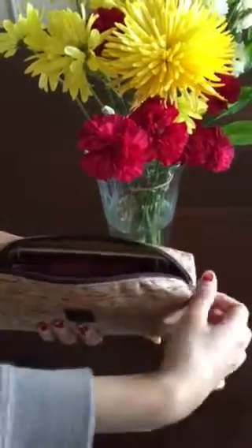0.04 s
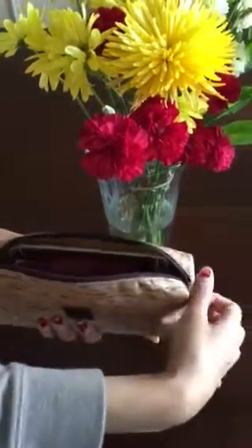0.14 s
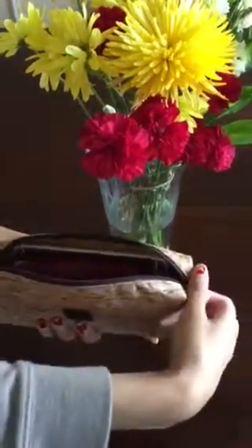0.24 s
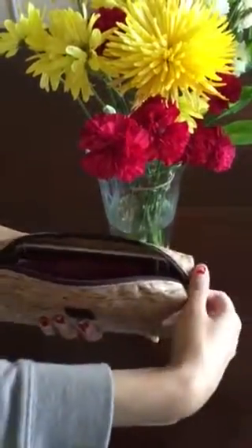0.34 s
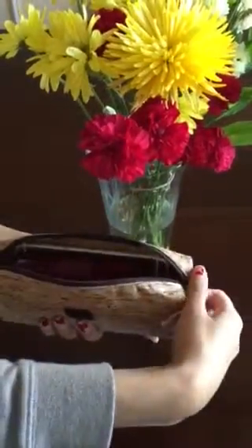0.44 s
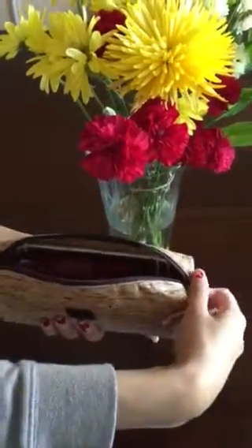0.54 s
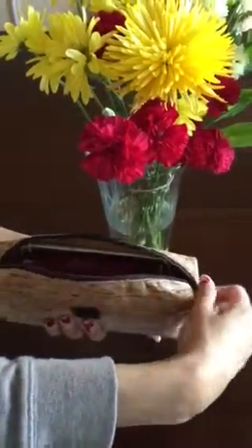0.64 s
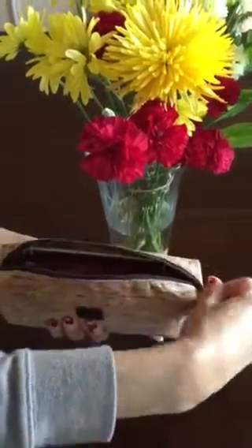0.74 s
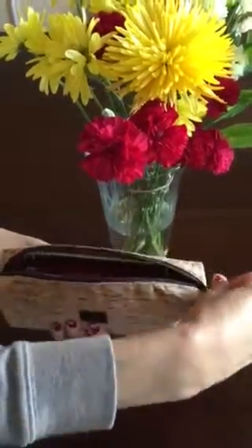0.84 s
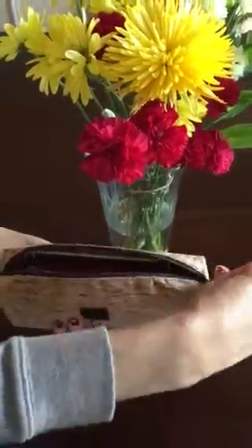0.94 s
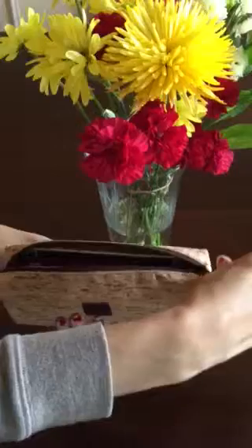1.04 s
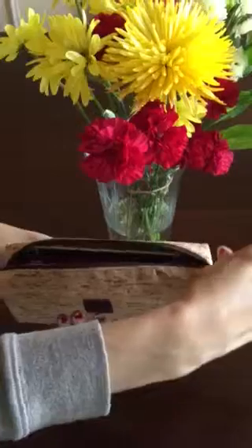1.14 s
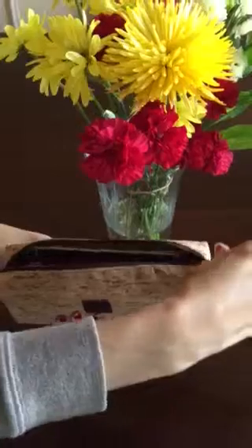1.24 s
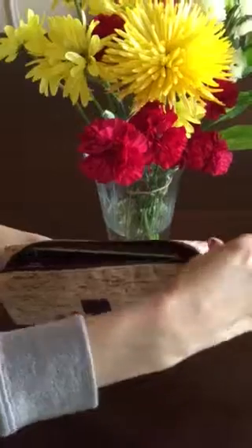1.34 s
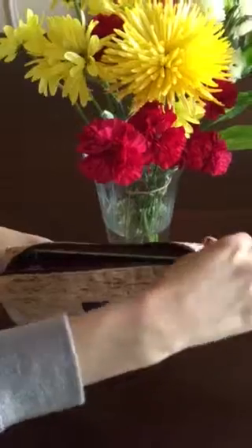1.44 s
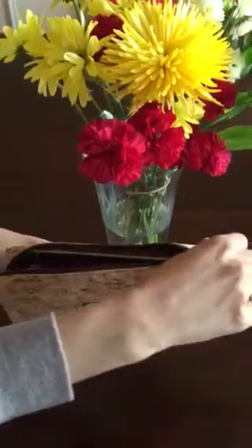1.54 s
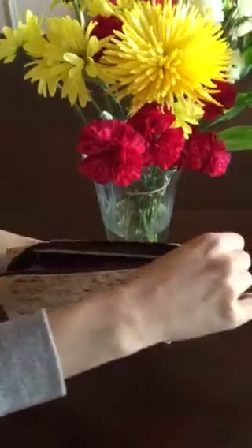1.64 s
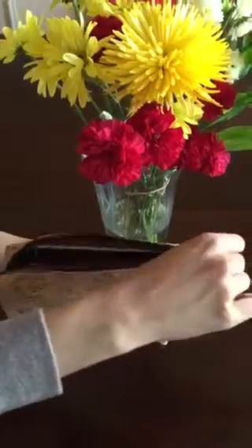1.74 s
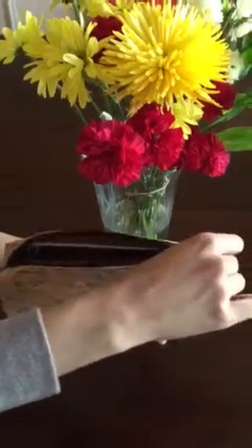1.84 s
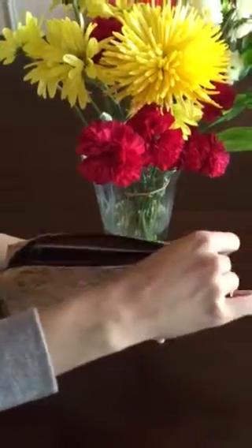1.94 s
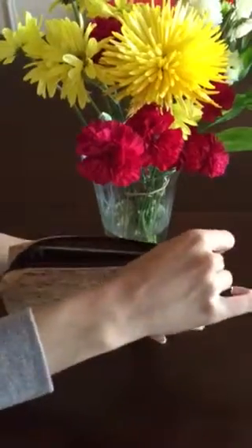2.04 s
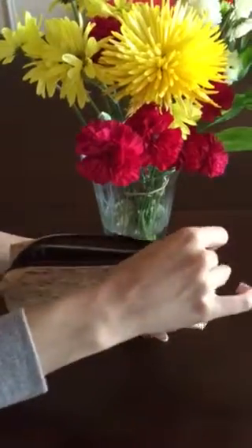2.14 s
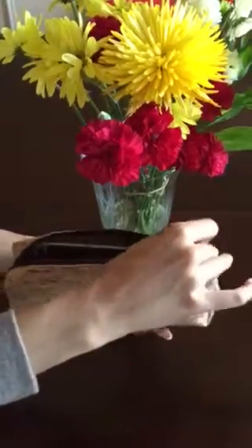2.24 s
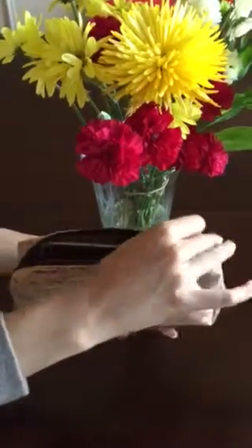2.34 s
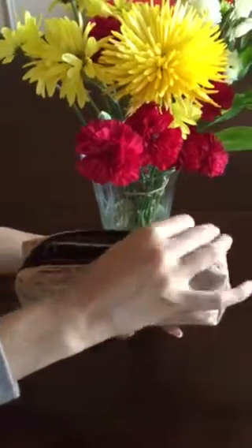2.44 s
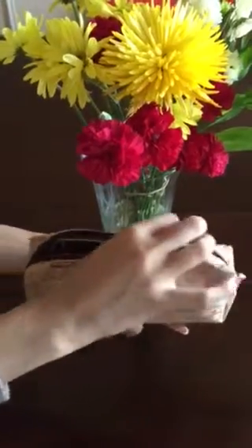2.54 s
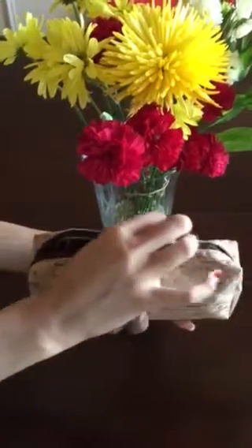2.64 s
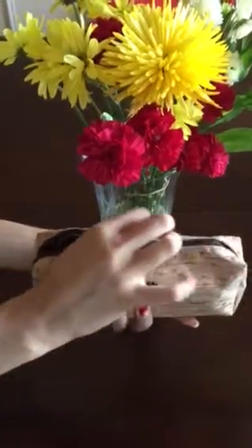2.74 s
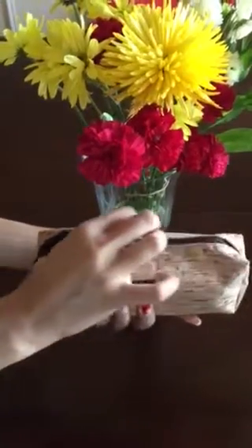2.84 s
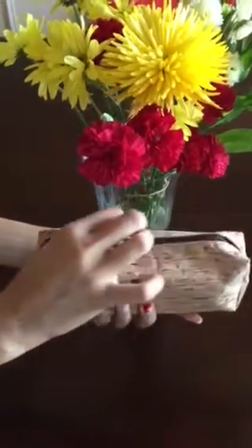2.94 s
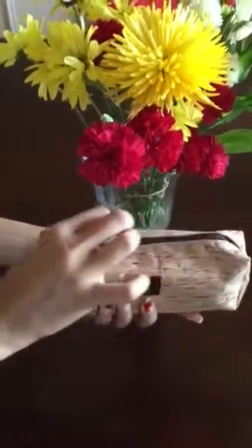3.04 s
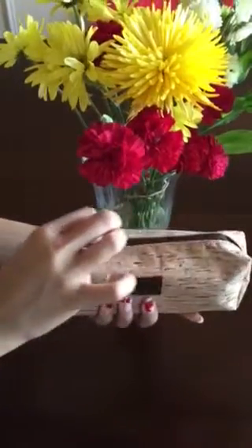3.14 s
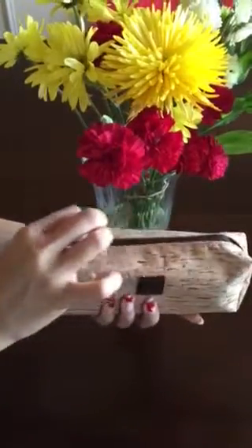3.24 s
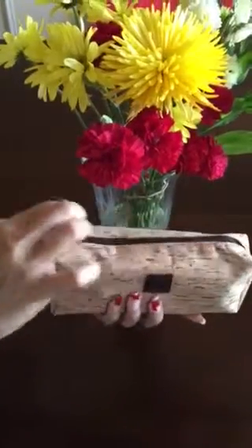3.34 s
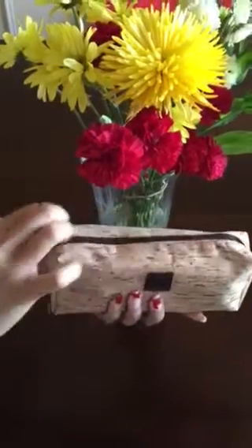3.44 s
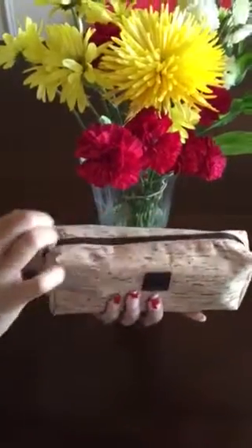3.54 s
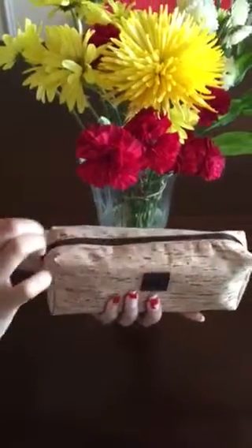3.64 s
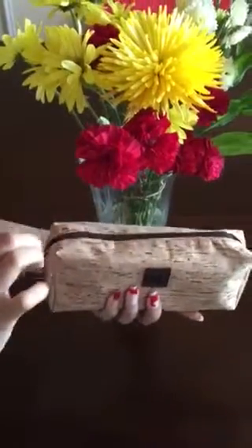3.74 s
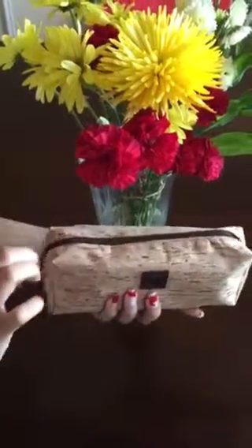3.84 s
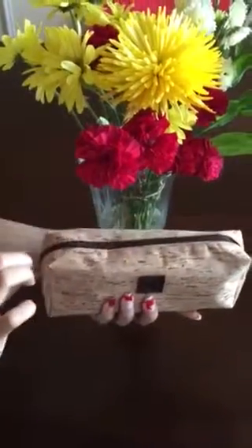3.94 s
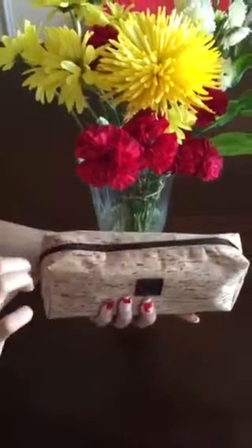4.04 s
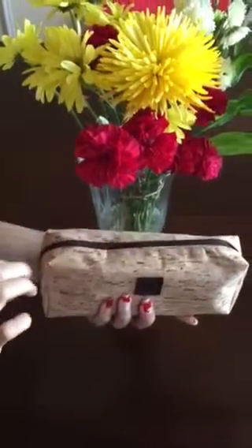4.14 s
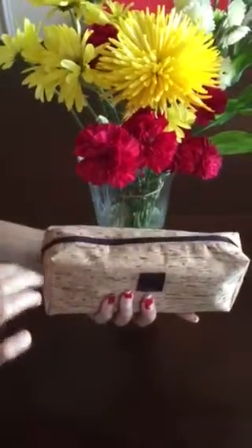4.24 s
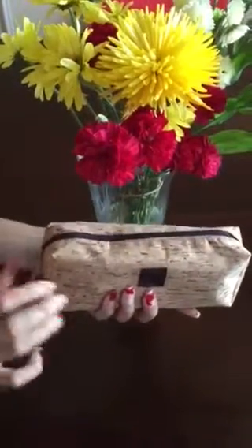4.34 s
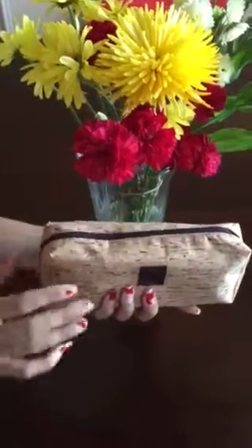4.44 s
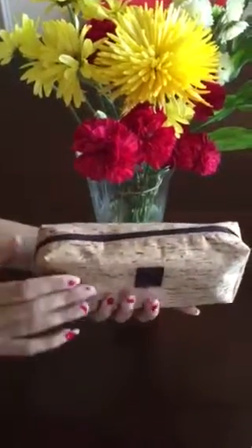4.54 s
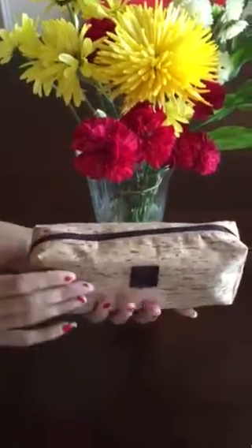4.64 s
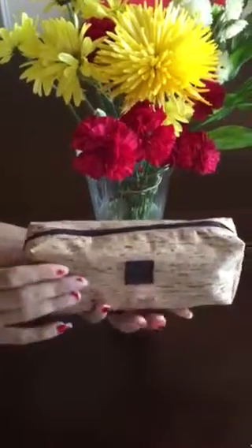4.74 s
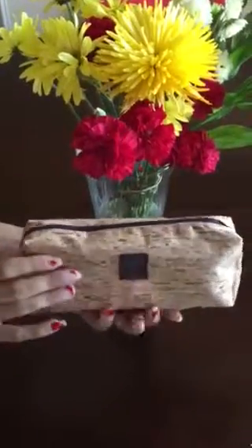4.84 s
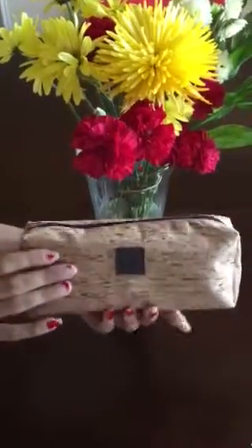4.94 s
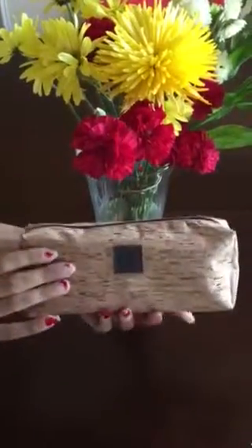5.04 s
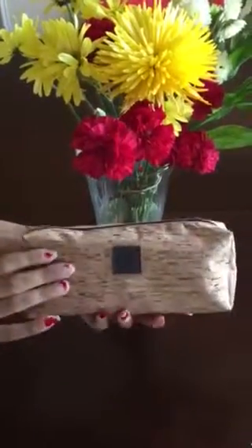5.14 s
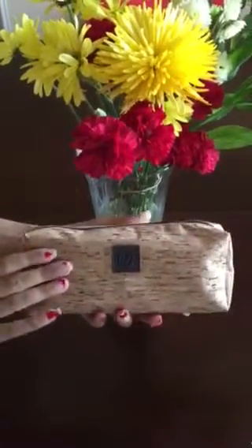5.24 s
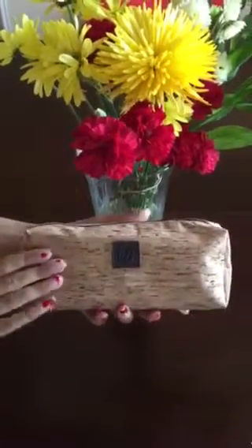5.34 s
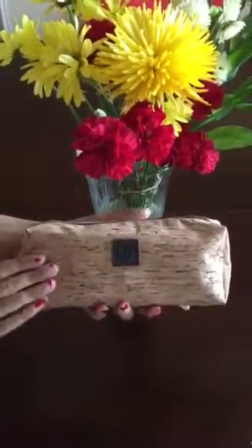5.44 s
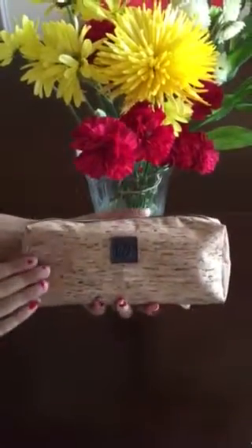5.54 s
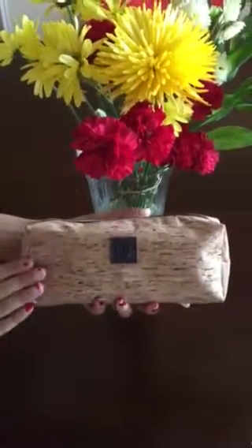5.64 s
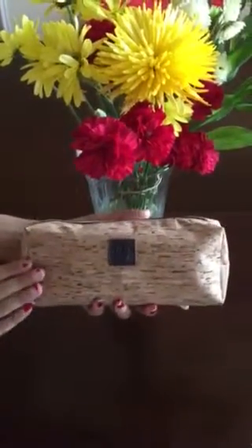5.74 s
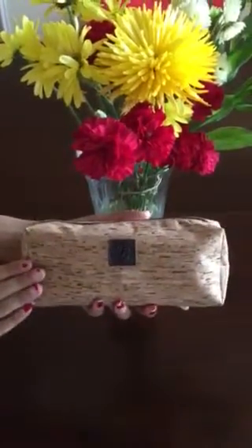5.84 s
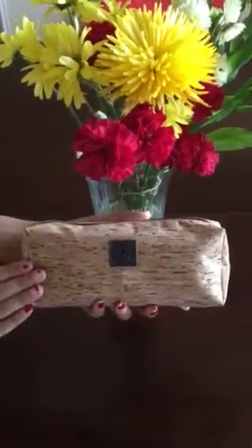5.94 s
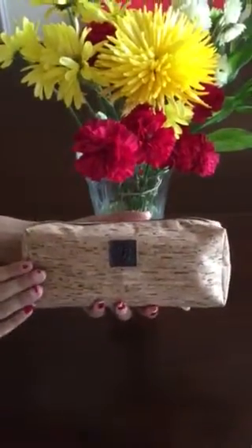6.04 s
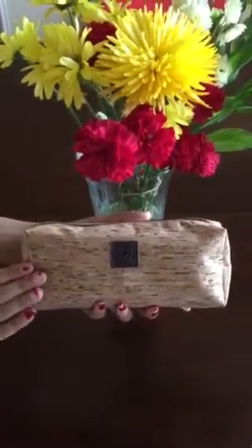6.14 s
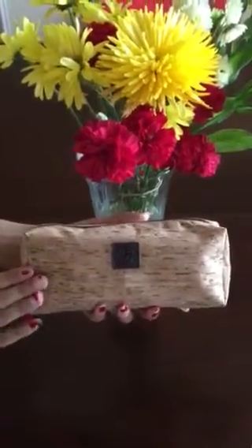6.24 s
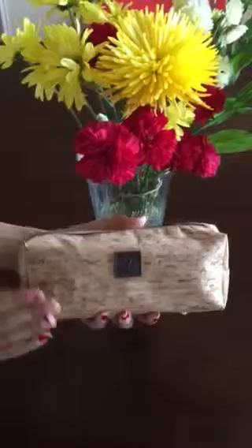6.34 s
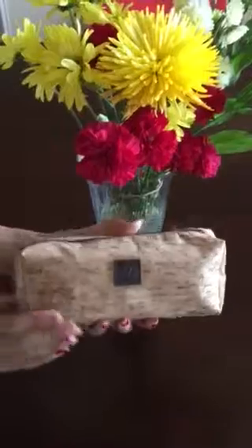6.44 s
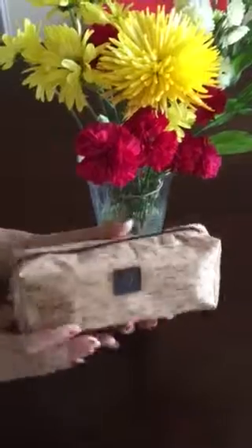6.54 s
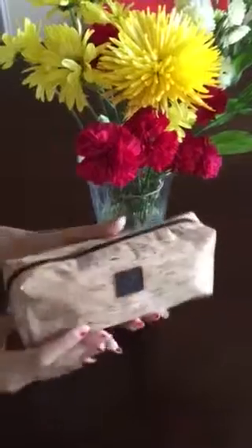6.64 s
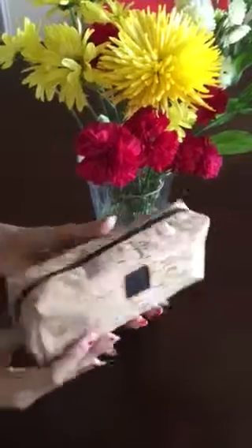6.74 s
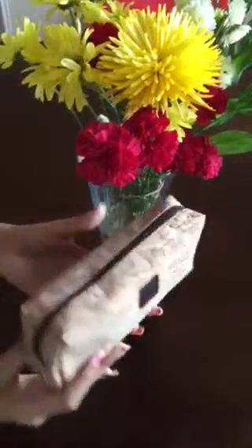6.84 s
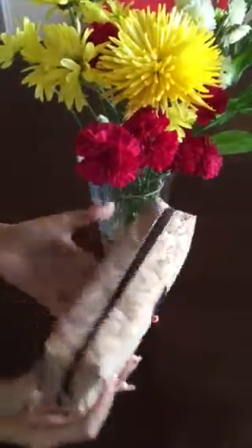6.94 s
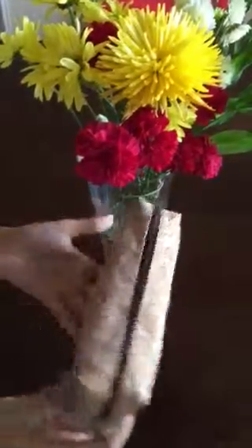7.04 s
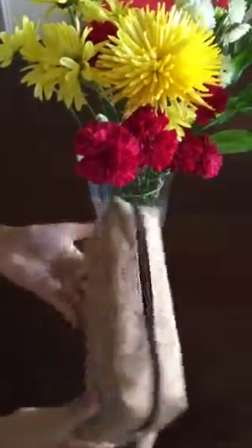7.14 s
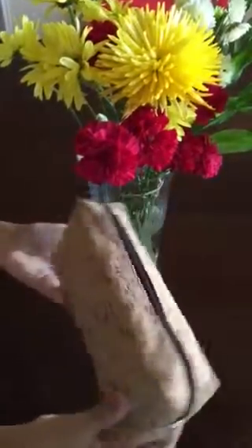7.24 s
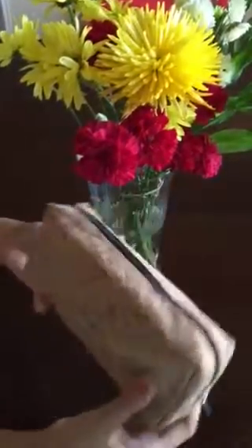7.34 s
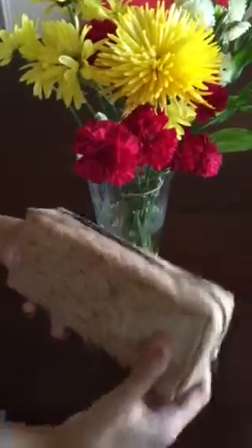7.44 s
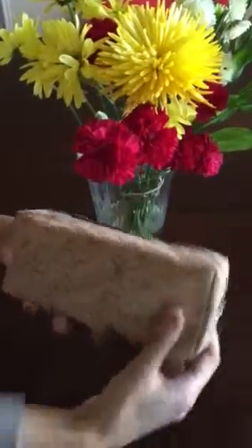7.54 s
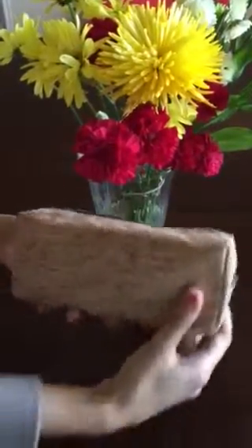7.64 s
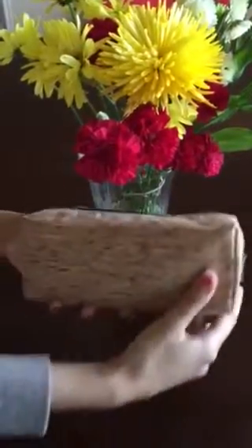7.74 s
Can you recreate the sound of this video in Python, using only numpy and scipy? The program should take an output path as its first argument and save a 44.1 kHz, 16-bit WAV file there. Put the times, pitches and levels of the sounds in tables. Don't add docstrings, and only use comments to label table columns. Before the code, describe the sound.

Fingers fumble at a small stiff pouch, its pull tab clicks, then the zipper is dragged shut in uneven rattling shoves over a faint appliance hum.

```python
import sys
import numpy as np
from scipy import signal
from scipy.fft import rfft, irfft, next_fast_len
from scipy.io import wavfile
from scipy.ndimage import uniform_filter1d, map_coordinates

SR = 44100
rng = np.random.default_rng(int(sys.argv[2]) if len(sys.argv) > 2 else 0)


def digitize_waveform(pressure):
    field = np.atleast_2d(pressure).T
    bounded = np.clip(field, -1, 1)
    quanta = np.round(bounded * 32767).astype(np.int16)
    wavfile.write(sys.argv[1], SR, quanta)


def voltage_ratio(decibels):
    exponent = np.asarray(decibels, float) / 20
    return 10 ** exponent


N = 342789

# (pitch [Hz], level [dB rms], start [cycles])
HUM_LINES = [(120, -54, .49), (117.15, -59, .68), (112.6, -67, .8)]
# (frequency [Hz], level [dB per Hz])
RUMBLE_COLOUR = [(22, -22), (35, -7), (45, -5), (70, 3), (80, -3.5), (92, 3), (104, -3.5), (125, -3.5),
                 (170, -14), (300, -30), (400, -44.5)]
# (frequency [Hz], level [dB per Hz])
AIR_COLOUR = [(90, -52), (150, -12.5), (250, -16), (500, -15.5), (1200, -19), (2800, -21.5), (4800, -27.5),
              (6500, -28.5), (9500, -32), (10500, -49), (11500, -33), (15300, -45)]
# (frequency [Hz], time to fall 60 dB [s])
ROOM_DECAY = [(200, 0.19), (1000, 0.16), (4000, 0.15), (12000, 0.026)]

# (start [s], length [s], fingertip hiss [dB], palm swish relative to it [dB])
RUB_STROKES = [(0.095, 0.047, -76, 2), (0.305, 0.22, -77, -0.5), (0.61, 0.11, -80, -6),
               (0.765, .03, -81, 3), (1.747, 0.054, -70, -1), (1.843, 0.072, -71, -1),
               (1.963, 0.074, -87, 11), (4.853, 0.42, -74.5, 2.5), (5.106, .012, -67, 2),
               (5.123, 0.28, -73.5, -2.5), (5.315, 0.064, -74.5, -5), (5.35, 0.19, -77.5, 2),
               (5.452, 0.3, -69.5, -9.5), (6.356, 0.13, -73, -6), (6.506, 0.27, -65, -8),
               (6.759, 0.17, -71, -0.5), (6.83, 0.7, -78.5, 1), (7.098, 0.019, -90, 9),
               (7.423, 0.27, -75.5, 0.5), (7.604, 0.028, -76, 8), (7.63, 0.2, -82, 4.5)]
# (frequency [Hz], level [dB per Hz])
SKIN_COLOUR = [(5000, -11), (7000, -4.5), (9300, 3), (10500, -1.5), (12500, 0.5), (15300, -5.5)]
# (frequency [Hz], level [dB per Hz])
PALM_COLOUR = [(1000, -9), (2500, -4), (5000, -5.5), (7500, -7), (12000, -50)]
# (frequency [Hz], level [dB per Hz])
CREASE_COLOUR = [(120, -16), (200, 3), (355, 4.5), (512, -11.5), (852, -6.5), (1770, -7.5), (1920, -9),
                 (9000, -44), (11700, -107), (19800, -120)]

# (pitch [Hz], level [dB], time to fall 60 dB [s])
BODY_MODES = [(222.6, 1, 0.019), (330, 3, 0.036), (416, -7, 0.063)]
# (pitch [Hz], level [dB], time to fall 60 dB [s])
PANEL_MODES = [(613, -1, 0.013), (764, 3.5, 0.011), (1020, -12, 0.036)]
# (pitch [Hz], level [dB], time to fall 60 dB [s])
TAPE_MODES = [(1276, 4, 0.0037), (1070, -1, 0.0022), (1828, -3.5, 0.014)]
# (pitch [Hz], level [dB], time to fall 60 dB [s])
SLIDER_MODES = [(2793, 3.5, 0.012), (3810, -5.5, .012), (4570, -12, 0.0085)]
# (pitch [Hz], level [dB], time to fall 60 dB [s])
COIL_MODES = [(1930, 3, 0.02)]
# (pitch [Hz], level [dB], time to fall 60 dB [s])
TAB_MODES = [(1846, -1.5, 0.0047), (2670, 2, 0.017), (4040, -1, 0.0033)]
# (pitch [Hz], level [dB], time to fall 60 dB [s])
JINGLE_MODES = [(4350, 3, 0.037), (5800, 3, 0.033), (1353, 14, 0.013), (823, 15, .02)]
# (frequency [Hz], level [dB per Hz])
GRIT_COLOUR = [(3600, -4), (4350, 4), (5000, -3), (5800, 4), (7500, -3), (10500, -8.5), (15000, -12)]
# (frequency [Hz], level [dB per Hz])
COIL_COLOUR = [(2500, 6), (4000, 11), (6200, 9), (8000, -10), (10500, -25), (15300, -19)]

# (time [s], peak [dB], ring pitch [Hz], panel relative level [dB], grit relative level [dB])
TAB_TAPS = [(4.383, -60, 3130, -18, -17), (4.392, -48, 2570, -6.5, -5.5), (4.406, -46.5, 2670, -38, -18),
            (4.5036, -57, 2280, -7, -4), (4.5103, -54.5, 3740, -7, -12), (4.606, -65, 3400, -22, -17),
            (5.1099, -48.5, 1810, -6.5, -14), (6.8816, -56, 4130, -29, -18), (6.9962, -62, 2910, -17, -18),
            (7.1132, -53.5, 3260, -13, -24), (7.4953, -57, 4100, -7, -14), (7.609, -54, 2310, -4, -13),
            (7.615, -51.5, 2520, -17, -18), (7.6241, -50, 2650, -20, -16)]
# (time [s], peak [dB], hollow body relative level [dB], hardness [dB])
FINGER_KNOCKS = [(0.079, -60, -15, -44), (0.113, -50.5, -1, -44), (0.156, -60, -15, -20),
                 (0.355, -63, -11, -12), (0.974, -64.5, 12, -20), (1.084, -39, -5, -26),
                 (1.095, -40.5, -11, -29), (1.101, -42.5, 6.5, -27), (1.125, -55, 3, -26),
                 (1.131, -41, -6, -32), (1.144, -54, -12, -36), (1.208, -52.5, -2, -24),
                 (1.222, -50, 2, -21), (1.242, -53.5, -10, -37), (1.351, -42.5, -8.5, -22),
                 (1.364, -44, -29, -23), (1.425, -45.5, -17, -28), (1.441, -50, -8, -25),
                 (1.495, -45, 9, -18), (1.517, -48, -10, -27), (1.565, -49.5, 1, -18.5),
                 (1.665, -61.5, -22, -18), (1.743, -44, -21, -24), (1.854, -52, -0.5, -12)]
# (time [s], peak [dB], hollow body relative level [dB], hardness [dB])
STUCK_TEETH = [(2.119, -69, -3, -12), (2.137, -45, 0, -5.5), (2.149, -46.5, 9, -17), (2.167, -53, -9, -13),
               (2.184, -43.5, -3, -27), (3.576, -48, -22, -28), (3.581, -43, -14, -16),
               (3.593, -40, -30, -25), (3.6, -48.5, -6, -13), (3.613, -52, -9, -15),
               (3.635, -41.5, -25, -14.5), (3.655, -40.5, -11, -23), (3.664, -40, -20, -26),
               (3.671, -55, 4, -9), (3.693, -42.5, -3, -26), (3.713, -43.5, -15, -25),
               (3.722, -43, -5, -18), (3.734, -39.5, -7.5, -18)]
# (time [s], peak [dB], hollow body relative [dB], tape relative [dB], slider relative [dB])
TAB_CLICKS = [(1.4783, -40, 0.5, -17, -2.5), (1.488, -41, 0, -8, -16), (1.75, -41.5, -35, -3, -11.5),
              (1.77, -56, -20, -12, -14), (1.789, -58, -12, -7, -18), (1.865, -48.5, -8.5, 7, 5.5),
              (1.88, -56, -18, 2, -5)]
# (time [s], peak [dB])
TAB_FLICKS = [
    (1.7495, -52),
    (1.769, -63),
]

# (time [s], teeth closed [count])
SHOVES = [
    [(2.003, 0), (2.106, 8)],
    [(2.208, 14), (2.295, 19), (2.335, 22), (2.371, 26), (2.386, 27), (2.447, 33), (2.487, 36), (2.523, 39),
     (2.577, 46)],
    [(2.583, 47), (2.663, 61), (2.714, 66), (2.815, 78), (2.886, 88), (2.981, 98), (3.078, 106),
     (3.216, 120), (3.251, 123)],
    [(3.258, 124), (3.322, 133), (3.4, 148), (3.466, 158), (3.559, 167)],
    [(3.751, 180), (3.771, 182), (3.791, 185), (3.832, 193), (3.891, 201)],
]
# (time [s], effort [dB], tape tautness [dB])
PULL_EFFORT = [(2.0, -51.5, -6), (2.04, -50.5, -3), (2.222, -55, -19), (2.33, -49, -8.5), (2.5, -53, 2),
               (2.57, -45, -6), (2.656, -42.5, -8.5), (2.792, -44, -10.5), (2.862, -43.5, -9.5),
               (2.942, -51, -7), (3.2, -49.5, 2), (3.28, -53.5, 1), (3.36, -44.5, 1), (3.466, -43, -8),
               (3.524, -58.5, -6), (3.75, -45, -9), (3.83, -36.5, -5), (3.9, -51.5, -16)]
# (teeth closed [count], panel pitch [Hz], tape pitch [Hz], slider pitch [Hz])
CLOSING_PITCHES = [(0, 590, 1230, 3020), (22, 694, 1430, 3020), (47, 723, 1460, 3070),
                   (59, 868, 1370, 2500), (88.6, 740, 1660, 2400), (105.7, 835, 1290, 2650),
                   (155, 750, 1325, 2770), (199, 752, 1104, 2520)]


def unit(x):
    return x / np.sqrt(np.mean(x ** 2) + 1e-20)


def along(points, hz):
    f, v = np.transpose(points)
    return np.interp(np.log(hz + 1), np.log(f + 1), v)


def read(rows, where):
    at, *cols = np.transpose(rows)
    return [np.interp(where, at, c) for c in cols]


def wobble(rate):
    knots = rng.standard_normal(int(N * rate / SR) + 4)
    return map_coordinates(knots, [np.arange(N) * rate / SR])


def coloured(x, spectrum):
    m = next_fast_len(N + 8192)
    gain = voltage_ratio(along(spectrum, np.fft.rfftfreq(m, 1 / SR)))
    return unit(irfft(rfft(x, m) * gain, m)[:N])


def flurry(spectrum, depth_db):
    swell_db = depth_db * np.clip(wobble(40) + wobble(300), -3, 3)
    return coloured(rng.standard_normal(N) * voltage_ratio(swell_db), spectrum)


def spread(s, rows):
    at = np.round(s * SR).astype(int)[:, None] + np.arange(rows.shape[1])
    return np.bincount(at.ravel(), rows.ravel(), N + rows.shape[1])[:N]


def ring(s, db, modes, bend, rough):
    t, out = np.arange(1024) / SR, 0
    for hz, level_db, t60 in modes:
        luck = rng.standard_normal((len(s), 4))
        pitch = (hz * bend * (1 + 0.022 * rough * luck[:, 0]))[:, None]
        size = voltage_ratio(db + level_db + 1.25 * luck[:, 1])[:, None]
        driven = 0.0035 * (800 / max(hz, 800)) ** 0.6 * np.exp(0.25 * luck[:, 3:])
        decay = voltage_ratio(-60 * np.maximum(t - driven, 0) / t60)
        swing = decay * (1 - np.exp(-t * min(hz, 900)))
        walk = np.cumsum(rng.standard_normal((len(s), 1024)), axis=1)
        wander = np.reshape(rough, (-1, 1)) * np.sqrt(hz / SR) * uniform_filter1d(walk, size=12)
        out = out + size * swing * np.sin(2 * np.pi * pitch * t + 1.3 * luck[:, 2:3] + wander)
    return spread(s, out)


def snaps(s, db, parts, grit_db, rough):
    t = np.arange(1024) / SR
    puff = voltage_ratio(-60 * t / 0.011) * (1 - np.exp(-t / 0.00078))
    puffs = spread(s, voltage_ratio(db + grit_db)[:, None] * puff)
    out = puffs * coloured(rng.standard_normal(N), [(1500, -49)] + GRIT_COLOUR + [(16000, -60)])
    for modes, rel_db, bend in parts:
        out = out + ring(s, db + rel_db, modes, bend, rough)
    return out


def clicks(s, db, body_db, tape_db, slider_db, grit_db, rough):
    parts = [(BODY_MODES, body_db + 0.5, 1), (PANEL_MODES, 0, 1),
             (TAPE_MODES, tape_db + 5.5, 1), (SLIDER_MODES, slider_db + 8, 1)]
    return snaps(s, db - 4.5, parts, grit_db + 8, rough)


def background():
    t, hum = np.arange(N) / SR, 0
    for hz, db, start in HUM_LINES:
        level = voltage_ratio(db + 1.5 + 0.39 * wobble(2.6))
        hum = hum + level * np.cos(2 * np.pi * (hz * t + start) + 0.072 * wobble(2.73))
    rumble = voltage_ratio(-59 + 1.82 * wobble(3.05)) * coloured(rng.standard_normal(N), RUMBLE_COLOUR)
    air = voltage_ratio(-74) * coloured(rng.standard_normal(N), AIR_COLOUR)
    return voltage_ratio(-4) * hum + rumble + air


def room(x):
    hz, t, z = signal.stft(rng.standard_normal(SR // 4), SR, nperseg=256)
    fading = z * voltage_ratio(-60 * t / along(ROOM_DECAY, hz)[:, None])
    tail = rfft(signal.istft(fading, SR, nperseg=256)[1])
    power = np.abs(tail) ** 2
    evening = np.abs(uniform_filter1d(power, size=200) / uniform_filter1d(power, size=12))
    tail = irfft(tail * np.sqrt(evening))
    tail[len(tail) * 3 // 4:] = 0
    late = np.pad(x, (260, 0))
    return signal.fftconvolve(late, tail / np.linalg.norm(tail))[:N]


def creasing():
    t = np.arange(N) / SR
    settle_at, settle_t60 = 3.9, 0.17
    level = voltage_ratio(-77.5) + voltage_ratio(-60 - 60 * np.abs(t - settle_at) / settle_t60)
    return level * flurry(CREASE_COLOUR, depth_db=1.5)


def rubbing():
    t, hiss, swish = np.arange(N) / SR, 0, 0
    rise, fall = 0.25, 0.46
    for s, length, db, palm_db in RUB_STROKES:
        u = (t - s) / length
        shape = np.clip(np.minimum(u / rise, (1 - u) / fall), 0, 1) ** 0.75
        stroke = voltage_ratio(db) * shape
        hiss = hiss + stroke
        swish = swish + voltage_ratio(palm_db) * stroke
    return hiss * flurry(SKIN_COLOUR, depth_db=1.0) + swish * flurry(PALM_COLOUR, depth_db=2.0)


def taps():
    s, db, hz, panel_db, grit_db = np.transpose(TAB_TAPS)
    parts = [(TAB_MODES, 0, hz / TAB_MODES[1][0]), (PANEL_MODES + TAPE_MODES[:1], panel_db - 3, 1)]
    return snaps(s, db - 3, parts, grit_db + 7, rough=1.2)


def fumbles():
    s, db, body_db, hard_db = np.transpose(FINGER_KNOCKS)
    return clicks(s, db, body_db, 0.38 * hard_db - 0.4, hard_db + 3, 0.73 * hard_db - 7, rough=1.04)


def tab_clicks():
    s, db, body_db, tape_db, slider_db = np.transpose(TAB_CLICKS)
    snapping = clicks(s, db, body_db, tape_db, slider_db - 1.5, 0.45 * slider_db - 5, rough=1.3)
    return snapping + ring(*np.transpose(TAB_FLICKS), JINGLE_MODES, 0.95, rough=0.4)


def catches():
    s, db, body_db, hard_db = np.transpose(STUCK_TEETH)
    return clicks(s, db, body_db, 0.74 * hard_db + 0.27, hard_db, 1.27 * hard_db, rough=1.0)


def grind(s, gap, effort_db, runs):
    t = np.arange(N) / SR
    speed_db = 18 * np.log10(1 / (120 * gap))
    drag = voltage_ratio(-68 + speed_db + 0.99 * (effort_db + 45))
    moving = sum((t > run[0]) & (t < run[-1] + 0.012) for run in runs) > 0
    level = uniform_filter1d(np.interp(t, s, drag) * moving, size=600)
    return level * (flurry(COIL_COLOUR, depth_db=2.0) + voltage_ratio(-7) * flurry(SKIN_COLOUR, depth_db=2.0))


def zipper():
    counts = [np.arange(shove[0][1], shove[-1][1] + 1) for shove in SHOVES]
    runs = [np.interp(count, *np.transpose(shove)[::-1]) for count, shove in zip(counts, SHOVES)]
    tooth, s = np.concatenate(counts), np.concatenate(runs)
    gap = np.concatenate([np.gradient(run) for run in runs])
    luck = rng.standard_normal((len(s), 5))
    s = s - 0.001 + 0.04 * gap * luck[:, 0]
    effort_db, taut_db = read(PULL_EFFORT, s)
    panel_hz, tape_hz, slider_hz = read(CLOSING_PITCHES, tooth)

    def drift():
        return wobble(14)[(s * SR).astype(int)]

    def bump(at, span):
        return np.exp(-((tooth - at) / span) ** 2)

    body_db = np.interp(tooth, [0, 116], [3, -9.5]) + 0.34 * (effort_db + 49) + 3 * luck[:, 3]
    tape_db = taut_db + 1.4 * luck[:, 4]
    slider_db = -12.5 + 7 * bump(93.4, 38) + 0.16 * (taut_db + 8)
    slider_db = slider_db - 0.13 * np.maximum(tooth - 150, 0) + 1.9 * drift()
    coil_db = -12.5 + 9 * bump(93, 24) + 1.8 * drift()
    grit_db = slider_db - 9 + 260 * gap * luck[:, 2]
    slider_hz = slider_hz * (1 + 0.041 * drift())
    panel_hz = panel_hz * (1 + 0.029 * drift())

    db = effort_db + 10 * np.log10(100 * gap) + 4.5 + 130 * gap * luck[:, 1]
    parts = [(BODY_MODES, body_db - 3, 1),
             (PANEL_MODES, 0, panel_hz / PANEL_MODES[1][0]),
             (TAPE_MODES, tape_db + 0.5, tape_hz / TAPE_MODES[0][0]),
             (SLIDER_MODES, slider_db + 3.5, slider_hz / SLIDER_MODES[0][0]),
             (COIL_MODES, coil_db, 1 + 0.036 * drift())]
    teeth = snaps(s, db, parts, grit_db, rough=0.3 + 0.0026 / gap)
    return teeth + grind(s, gap, effort_db, runs)


def scene():
    pouch = taps() + fumbles() + tab_clicks() + catches() + zipper()
    answer = voltage_ratio(-12.5) * room(pouch)
    return (background() + creasing() + rubbing() + answer + pouch)[None]


def band_limit(x):
    return signal.sosfilt(signal.butter(12, 15670, fs=SR, output="sos"), x)


def record(dry):
    low_cut = signal.butter(2, 30, "high", fs=SR, output="sos")
    top_cut = signal.ellip(10, 0.5, 60, 15500, fs=SR, output="sos")
    mix = signal.sosfilt(top_cut, signal.sosfilt(low_cut, dry))
    return band_limit(mix)


dry = scene()
out = record(dry)
digitize_waveform(out)
```